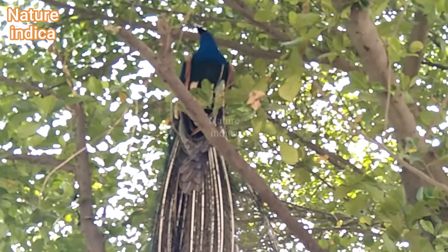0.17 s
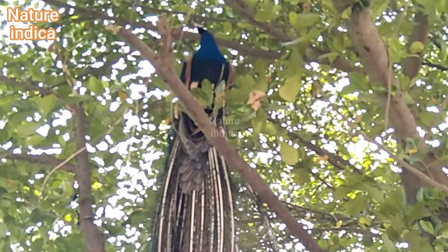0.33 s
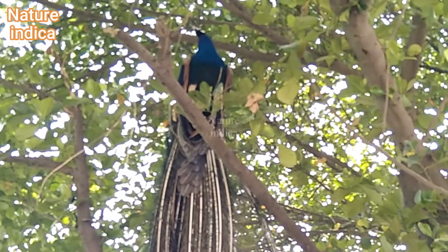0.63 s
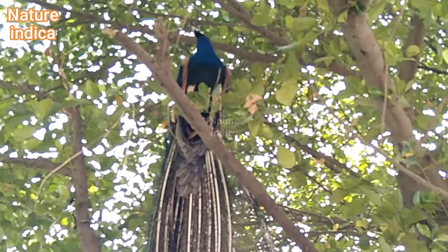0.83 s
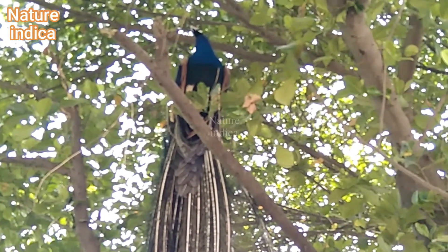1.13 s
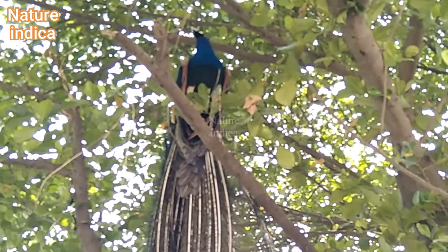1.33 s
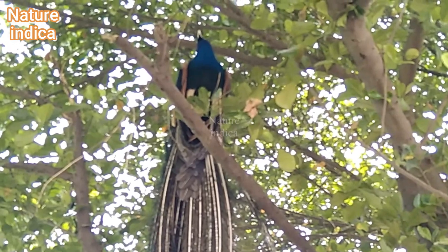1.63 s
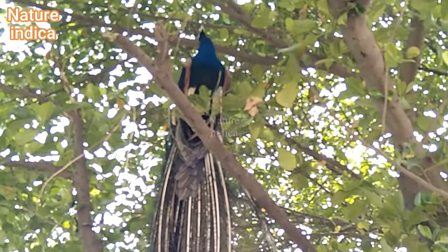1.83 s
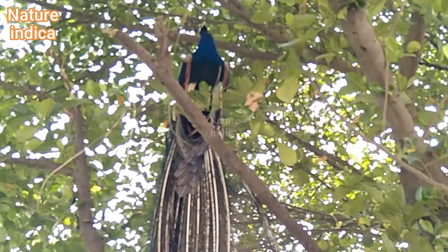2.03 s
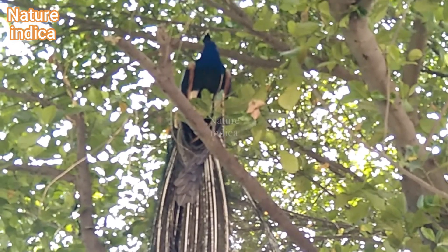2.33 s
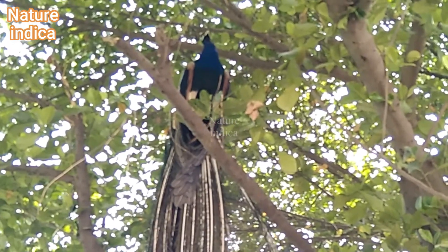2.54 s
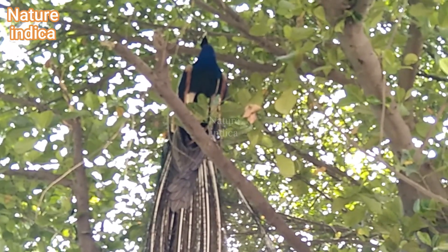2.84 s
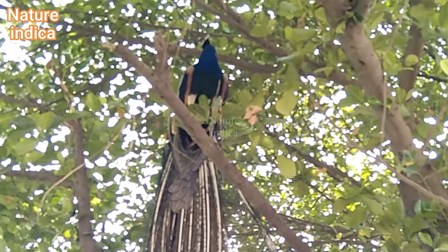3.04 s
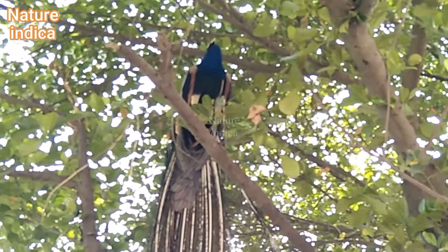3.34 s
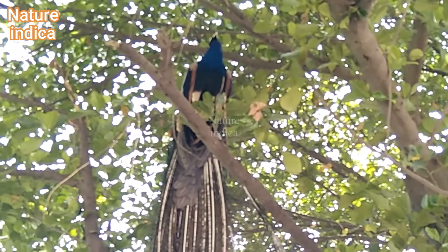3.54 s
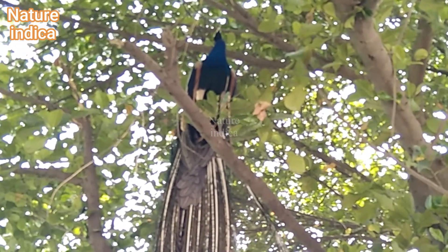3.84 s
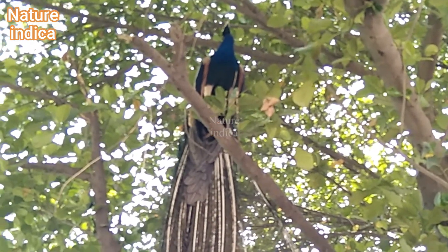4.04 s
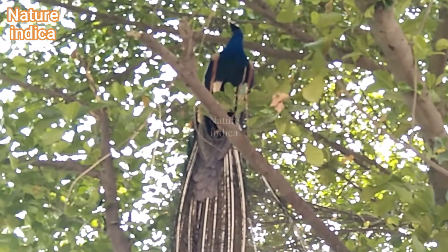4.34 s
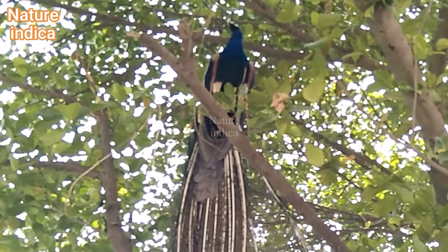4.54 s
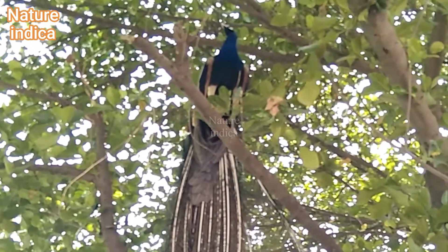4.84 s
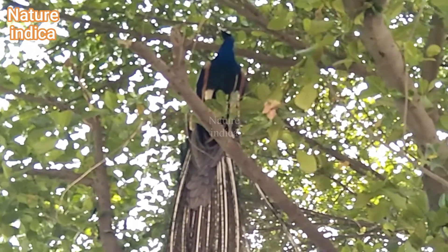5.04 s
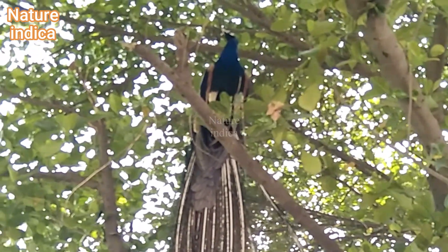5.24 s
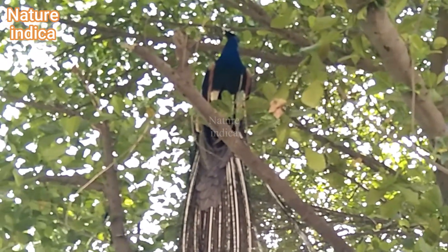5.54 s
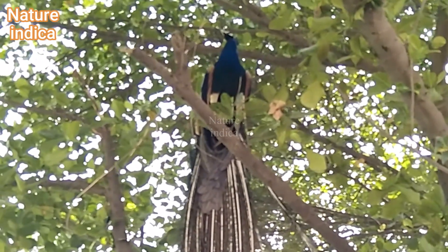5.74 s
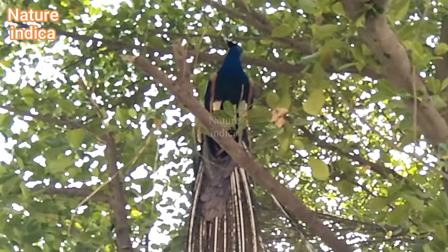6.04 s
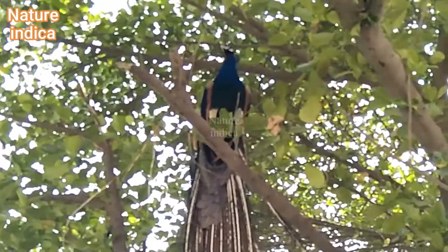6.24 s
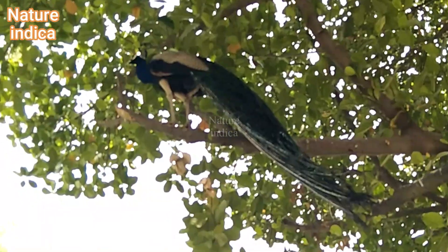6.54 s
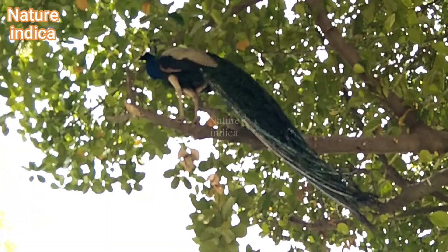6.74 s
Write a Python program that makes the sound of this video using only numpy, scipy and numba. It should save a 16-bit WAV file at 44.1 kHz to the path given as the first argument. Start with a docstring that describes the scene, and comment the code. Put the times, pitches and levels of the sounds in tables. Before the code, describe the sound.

A peacock wails loudly twice close by, first fluttering then clear, over crows, chirps and a puttering engine; a distant peacock answers at the end.

```python
"""Peacock wailing in a garden

A peacock wails twice close by, first with a fluttering voice, then clear; the garden echoes it. Syrinx tones
ring throat resonances, in crow caws too; small birds are gliding sines, swishes, leaves and insects shaped noise.
A far one-cylinder engine is pulses ringing an exhaust. At the end the place changes: another background
hiss, no engine, and a distant peacock of few partials. Mono in both channels, with gain control."""
import sys
import numpy as np
from scipy import signal
from scipy.io import wavfile
from scipy.ndimage import uniform_filter1d, map_coordinates
from numba import njit

SR = 44100
rng = np.random.default_rng(int(sys.argv[2]) if len(sys.argv) > 2 else 0)


def int16_out(signal):
    """Quantize to a 16-bit WAV file."""
    q = np.round(np.clip(np.atleast_2d(signal).T, -1, 1) * 32767)
    wavfile.write(sys.argv[1], SR, q.astype(np.int16))


N = 303849
T = np.arange(N) / SR
CHANGE_S = 6.365  # the second place begins
TOP_HZ = 15500


def undb(db):
    """Amplitude ratio of a level in dB."""
    return 10 ** (np.asarray(db) / 20)


def unit(x):
    """Scale to an rms of 1."""
    return x / np.sqrt(np.mean(x ** 2))


def noise():
    """White noise as long as the scene."""
    return rng.standard_normal(N)


def read(table, t):
    """Columns of a curve table at times t."""
    s, *columns = np.transpose(table)
    return [np.interp(t, s, c) for c in columns]


def span(start_s, length_s, fade_s=0.0036, out_s=None):
    """Sample slice of an event, progress 0-1 through it, and soft ends."""
    part = slice(int(start_s * SR), min(int((start_s + length_s) * SR), N))
    t = T[part] - T[part][0]
    ends = np.minimum(t / fade_s, (t[-1] - t) / (out_s or fade_s))
    return part, t / t[-1], np.clip(ends, 0, 1)


@njit
def svf(x, hz, width_hz):
    """State-variable band-pass with a moving centre, gain 1 there."""
    y, band_state, low_state = np.empty(len(x)), 0., 0.
    for i in range(len(x)):
        g, k = np.tan(np.pi * hz[i] / SR), width_hz / hz[i]
        v = (band_state + g * (x[i] - low_state)) / (1 + g * (g + k))
        band_state, low_state = 2 * v - band_state, low_state + 2 * g * v
        y[i] = k * v
    return y


def band(x, hz, width_hz):
    """Band-pass with a fixed centre."""
    return svf(x, hz + np.zeros(len(x)), 1. * width_hz)


def band_twice(x, hz, width_hz):
    """Two equal band-passes in series, for steeper skirts."""
    return band(band(x, hz, width_hz), hz, width_hz)


@njit
def follow(x, attack, release):
    """Envelope that rises fast and falls slowly."""
    y, e = np.empty(len(x)), 0.
    for i in range(len(x)):
        e += (abs(x[i]) - e) * (attack if abs(x[i]) > e else release)
        y[i] = e
    return y


def walk(rate_hz, size=N):
    """Random levels held 1 / rate_hz s and slewed twice; spread near 1."""
    hold = int(SR / rate_hz)
    steps = np.repeat(rng.standard_normal(size // hold + 1), hold)
    return 1.3 * uniform_filter1d(uniform_filter1d(steps, hold), hold)[:size]


def steady(x):
    """Even out the slow level, so that a curve alone sets it."""
    return x / np.sqrt(uniform_filter1d(x ** 2, SR // 20) + 1e-12)


def coloured(points, patchy_db, flicker_db):
    """Noise whose level wanders in broad slow patches and in narrow quick ones."""
    hz, db = np.transpose(points)
    f, t, frames = signal.stft(noise(), SR, nperseg=1024)
    octave = np.log2(np.maximum(f, 20) / 20)[:, None]
    gain_db = np.interp(np.log(np.maximum(f, 1)), np.log(hz), db)[:, None]
    for depth_db, per_octave, per_s in ((patchy_db, 1.5, 2.5), (flicker_db, 8, 4)):
        place = np.broadcast_arrays(octave * per_octave, t[None] * per_s)
        gain_db = gain_db + depth_db * map_coordinates(rng.standard_normal((90, 60)), place, order=1)
    return unit(signal.istft(frames * undb(gain_db), SR, nperseg=1024)[1][:N])


def syrinx(hz, flutter_hz, depth, bend, rasp, tilt, sway_db):
    """Membranes at the pitch, and the slower flutter that shakes them; rasp turns the cycles noisy."""
    size = len(hz)
    beat = 2 * np.pi * np.cumsum(flutter_hz * (1 + .006 * walk(21.0, size))) / SR
    # each flutter beat rises a little faster than it falls
    shape = np.sin(beat) + .3 * np.sin(2 * beat)
    pitch_hz = hz * (1 + bend * np.sin(beat + 0.29) + 0.018 * rasp * walk(300, size))
    phase = 2 * np.pi * np.cumsum(pitch_hz) / SR
    tone = np.zeros(size)
    for k in range(1, 27):
        # every overtone swells and sinks at random on its own
        sway = undb(sway_db * walk(17.37, size))
        tone += k ** -tilt * sway * np.cos(k * phase) * (k * hz < TOP_HZ)
    puffs = unit(np.gradient(rng.standard_normal(size)) * (7.8 + np.cos(phase)))
    source = unit(tone) * np.sqrt(1 - np.clip(rasp, 0, .95) ** 2) + rasp * puffs
    return source, np.maximum(depth * shape, -.95)


def first_place_air():
    """Distant traffic and air: patchy coloured noise."""
    # spectrum: hz, level_db (per Hz)
    spectrum = [(15, -35), (25, -34), (76, 13), (249, -7), (397, -12.5), (615, -4), (1170, -1), (1300, 1.5),
                (1730, 0), (2750, -8), (3380, -3.5), (4610, -1), (6130, -18.5), (8800, -35), (12000, -73),
                (15600, -84), (22000, -120)]
    return coloured(spectrum, 4.0, 6.0) * undb(-54.5)


def leaves():
    """Rustle: patchy noise, strongest below about 8 kHz, following a level curve."""
    # rustle: start_s, level_db
    rustle = [(0, -80), (1.1, -98), (1.3, -51.5), (1.8, -51), (4.2, -85), (5.1, -59), (5.4, -55),
              (6.0, -53)]
    # spectrum: hz, level_db (per Hz)
    spectrum = [(800, -4), (2500, -2), (4500, -2), (8000, -10.5), (11000, -26), (15500, -32)]
    return coloured(spectrum, 3.0, 4.5) * undb(read(rustle, T)[0])


def second_place_hiss():
    """Background of the second place: nearly even coloured noise."""
    # spectrum: hz, level_db (per Hz)
    spectrum = [(15, -43), (25, -7), (213, -7), (377, -19.5), (776, -16), (1240, -16), (1560, -13),
                (2180, -16), (3050, -18.5), (9510, -16), (12000, -73), (15600, -100), (22000, -120)]
    return coloured(spectrum, 0.43, 0.68) * undb(-50)


def insects():
    """Hiss: bands of noise, each swelling slowly on its own."""
    # hiss bands: centre_hz, width_hz, level_db
    bands = [(8580, 120, -69.5), (9280, 460, -70), (7380, 790, -69)]
    return sum(unit(band_twice(noise(), f, w)) * undb(db + 1.7 * walk(2.5)) for f, w, db in bands)


def background():
    """Air and leaves of the first place, then the second place's hiss; insects throughout."""
    return np.where(T < CHANGE_S, first_place_air() + leaves(), second_place_hiss()) + insects()


def chatter(count=260):
    """A flock further off: many faint falling chirps at random moments."""
    # chirp level curve: start_s, peak_db
    curve = [(0, -86), (1.2, -84), (1.8, -44), (4.0, -70), (4.7, -52), (5.4, -50.5), (6.3, -52.5),
             (6.89, -68)]
    when, length, top, fall, size = rng.random((count, 5)).T
    s = when * (N / SR - .1)
    db = read(curve, s)[0] + 3.4 * np.log(size + 0.071)
    from_hz = 3300 + 2100 * top
    return list(zip(s, 0.009 + 0.0293 * length, from_hz, from_hz * (.95 - 0.211 * fall), db))


def murmur(count=70):
    """Far bird calls: long, faint, slowly gliding tones."""
    when, length, height, glide, size = rng.random((count, 5)).T
    s = when * (N / SR - .5)
    hz = 500 * 6 ** height
    db = -60.5 + 2.1 * np.log(size + 0.098)
    return list(zip(s, 0.093 + 0.36 * length, hz, hz * (1 + .12 * (2 * glide - 1)), db))


def small_birds():
    """Chirps and far calls: sines gliding under a smooth hump of level."""
    # nearer chirps, mostly falling: start_s, length_s, from_hz, to_hz, peak_db
    nearer = [(1.418, 0.043, 3900, 3200, -49), (1.496, 0.061, 4400, 3700, -52),
              (1.619, 0.046, 4700, 4070, -50), (1.728, 0.06, 4860, 3800, -65),
              (4.004, 0.075, 3960, 3396, -57.5), (4.295, 0.057, 5250, 5300, -54),
              (4.337, 0.036, 5250, 3920, -52), (4.615, .11, 5400, 5220, -60),
              (4.676, 0.054, 5430, 4080, -55), (5.046, .03, 5400, 3850, -53),
              (5.035, .016, 3800, 3020, -49), (5.1, 0.028, 3900, 2940, -46),
              (5.205, 0.036, 4550, 3800, -49), (5.236, 0.018, 3170, 2800, -50),
              (5.588, .025, 4300, 3880, -47), (5.792, 0.041, 4600, 3940, -47)]
    out = np.zeros(N)
    for s, length_s, from_hz, to_hz, db in nearer + chatter() + murmur():
        size, at = int(length_s * SR), int(s * SR)
        phase = 2 * np.pi * np.cumsum(np.linspace(from_hz, to_hz, size)) / SR
        out[at:at + size] += undb(db) * np.hanning(size) * np.sin(phase)
    return out


def swishes():
    """Hoarse swishes: rough noise through a band whose centre moves along a parabola."""
    # swishes: start_s, length_s, from_hz, middle_hz, to_hz, level_db
    events = [(0.117, 0.16, 4060, 5860, 5230, -57), (2.844, 0.19, 5670, 4520, 3820, -49.5),
              (5.426, 0.11, 3250, 2630, 2480, -47), (5.919, 0.36, 4560, 5290, 3820, -49)]
    width_hz = 900.
    out = np.zeros(N)
    for start_s, length_s, from_hz, mid_hz, to_hz, db in events:
        part, x, ends = span(start_s, length_s, fade_s=0.043)
        bow_hz = (from_hz + to_hz) / 2 - mid_hz
        hz = mid_hz + (to_hz - from_hz) * (x - .5) + bow_hz * (2 * x - 1) ** 2
        air = rng.standard_normal(len(hz)) * undb(1.3 * walk(70.6, len(hz)))
        out[part] += unit(svf(svf(air, hz, width_hz), hz, width_hz)) * undb(db) * ends
    return out


def ticks():
    """Ticks: a sine and a burst of bright noise dying within milliseconds."""
    # ticks: start_s, level_db, tone_hz
    events = [(0.1796, -38, 5820), (1.791, -49, 3500), (4.11, -44, 4200), (6.6184, -33, 6760),
              (6.6628, -37.5, 2950)]
    out = np.zeros(N)
    t = T[:400]
    decay = np.exp(-t / 0.0014) * np.clip(t / 0.00019, 0, 1)
    for s, db, hz in events:
        at = int(s * SR)
        burst = 1.9 * band_twice(rng.standard_normal(400), 6500, 5200)
        out[at:at + 400] += undb(db) * decay * (np.sin(2 * np.pi * hz * t) + burst)
    return out


def engine():
    """One push per firing rings the exhaust; a wall sends it back a little later."""
    # firing rate: start_s, firings_per_s
    speed = [(1.082, 5.64), (1.54, 17.39), (2.1, 17.89), (2.38, 16.69), (2.62, 12.8), (3.2, 12.5),
             (3.8, 12.94), (4.5, 12.59), (5.2, 12.76), (6.36, 13.38)]
    # loudness: start_s, level_db
    loudness = [(1.0, -72), (1.55, -54), (2.1, -57), (3.0, -70), (4.0, -56.5), (4.6, -53), (5.0, -58),
                (5.5, -52), (6.3, -52)]
    # exhaust resonances: centre_hz, nominal_width_hz, level_db (relative)
    exhaust = [(76.5, 62, -11), (138, 50, -8), (223, 97, -8)]
    t = T - .008
    running = (t > 1.082) * (T < CHANGE_S)
    turns = np.floor(np.cumsum(read(speed, t)[0] * running) / SR)
    fired = np.flatnonzero(np.diff(turns) > 0)
    pulses = np.zeros(N)
    pulses[fired] = undb(0.3 * rng.standard_normal(len(fired)))
    thump = np.zeros(N)
    for k, (f, w, db) in enumerate(exhaust):
        thump += (-1) ** k * undb(db) * band_twice(pulses, f, 0.84 * w) / w
    thump = thump + undb(-16.5) * np.roll(thump, int(0.0244 * SR))
    return unit(thump) * undb(read(loudness, T)[0])


def crows():
    """Harsh caws: a voice chopped 99 to 191 times a second; pitch and level arch together."""
    # caws: start_s, length_s, top_pitch_hz, peak_db, chop_hz, top_place (0-1), dulling_db_per_khz, rasp (0-1)
    caws = [(1.099, .24, 590, -39, 103.4, 0.61, 1.2, 0.58),
            (1.558, 0.25, 601.4, -37.5, 99.1, 0.27, 2.8, 0.42),
            (4.323, .27, 563, -40.5, 190.8, .72, 1, 0.44)]
    # throat resonances: centre_hz, width_hz, level_db (relative)
    throat = [(1340, 720, 1.5), (1500, 122, 1.5), (3120, 360, -3.5), (6360, 560, -9)]
    sag, fade_db = .15, 6  # pitch share and level lost at the ends
    out = np.zeros(N)
    for start_s, length_s, top_hz, db, chop_hz, top, dull_db, rasp in caws:
        part, x, ends = span(start_s, length_s, fade_s=0.047)
        off = np.interp(x, [0, top, 1], [1, 0, 1]) ** 2
        hz = top_hz * (1 - sag * off + .02 * walk(25, len(x)))
        source, chop = syrinx(hz, chop_hz, .8, .02, rasp, tilt=.2, sway_db=2.5)
        source += rasp * rng.standard_normal(len(x))  # air rushing past the membranes
        chopped = source * (1 + chop)
        voice = sum(undb(d - dull_db * f / 1000) * band_twice(chopped, f, w) for f, w, d in throat)
        out[part] = steady(voice) * undb(db - fade_db * off) * ends
    return out


def peacock():
    """Each wail rings the throat resonances, whose balance shifts as the beak opens."""
    # per wail: start_s, pitch_hz, level_db, beak_opening (0-1), treble_lift_db, rasp (0-1)
    wails = [
        [(1.845, 680.5, -25, 0.068, 6, 0.47), (1.95, 688.4, -22, 0, 0, 0.49),
         (2.03, 718.7, -17, 0.42, -2.5, 0.58), (2.17, 729, -13, 0.98, 5.5, 0.4),
         (2.25, 709.8, -12, 1, 4.5, 0.36), (2.45, 706.1, -13, 0.96, 2, 0.36),
         (2.6, 689.6, -14, 0.98, -3.5, 0.58), (2.7, 664, -16, 1, -13.5, 0.36),
         (2.755, 645, -19, 0.99, -15, 0.55), (2.8, 614, -30.5, 1, -3, 0.3)],
        [(3.055, 573, -25.5, 0.2, 2, 0.075), (3.075, 577, -17, 0.046, 4.5, 0.1),
         (3.135, 596, -14.5, 0, -5.5, 0.075), (3.19, 579.2, -12.5, 0, 2.5, 0.11),
         (3.23, 582.7, -12.5, 0, -2, .1), (3.241, 669.3, -11, 0, -8, 0.27), (3.262, 698.6, -16, 0, 9.5, 0.15),
         (3.305, 722.2, -12.5, 0.28, 2, 0.064), (3.36, 731.6, -13.5, 0.45, 6.5, 0.079),
         (3.45, 738, -13, 0.74, 2, 0.054), (3.53, 736.6, -13.5, 0.74, -2.5, 0.037),
         (3.585, 728, -13, 0.68, 3, 0.078), (3.65, 700, -13.5, 0.69, 2, 0.044),
         (3.705, 664.6, -14.5, 0.49, 2, 0.097), (3.76, 649.2, -15, 0.24, -6.5, 0.097),
         (3.8, 610, -20, 0, -7.5, 1), (3.83, 587, -20.5, 0.065, -12, 0.99), (3.87, 578.5, -36, 0.91, 0, 0.88)],
    ]
    # throat: centre_hz, width_hz, wail1_narrow_db, wail1_wide_db, wail2_narrow_db, wail2_wide_db
    throat = [(1314, 417, -4.5, -2.5, -8.5, 2), (2231, 330, -13, -17, 1.5, -14.5),
              (2920, 240, -51, -14, -27, -18.5), (3565, 560, -5, -12, -5.5, -12),
              (4560, 1820, -38, -7.5, -17.5, -13.5), (6004, 1160, -2, -25.5, -20.5, -3),
              (7900, 2560, -13, -6, -13, -9)]
    # flutter rate: start_s, rate_hz
    flutter_rate = [(1.845, 33.6), (1.9, 42.2), (2.0, 51.33), (2.2, 53.9), (2.33, 49.47), (2.8, 50.17)]
    # per wail, beak narrow then wide: depth, depth, lowest_partial_db, _db, highest_overtones_db, _db
    flutters = [(0.96, 0.6, -10, -12.5, -39, -29), (.05, .01, -19, -8.5, -43, -36)]
    # per wail: share of the pitch that the flutter bends
    bends = [.01, .0007]
    # nearby ground and trunks: delay_s, level_db
    reflections = [(.0043, -6.5), (.0091, -9), (.0157, -9), (.0238, -26), (.0351, -14)]
    lag_s, fall = .0006, .78  # flutter per resonance: later and shallower
    out = np.zeros(N)
    for call, (table, bend, (narrow, wide, *outer_db)) in enumerate(zip(wails, bends, flutters)):
        part, _, ends = span(table[0][0], table[-1][0] - table[0][0], out_s=.04)
        hz, db, opening, lift_db, rasp = read(table, T[part])
        opening = np.clip(opening, 0, 1)
        depth = narrow + (wide - narrow) * opening
        rate_hz, = read(flutter_rate, T[part])
        source, flutter = syrinx(hz, rate_hz, depth, bend, rasp, tilt=0.12, sway_db=3.8)
        source += sum(undb(d) * np.roll(source, int(s * SR)) for s, d in reflections)

        gains = []
        for k, (_, _, *d) in enumerate(throat):
            narrow_db, wide_db = d[2 * call:2 * call + 2]
            treble_db = lift_db * k / (len(throat) - 1)
            gains.append(undb(narrow_db + (wide_db - narrow_db) * opening + treble_db))
        gains = np.array(gains)
        gains /= np.sqrt(np.sum(gains ** 2, axis=0))

        # the highest overtones escape the resonances
        highest_db = np.interp(opening, [0, 1], outer_db[2:]) + lift_db / 2
        voice = undb(highest_db) * steady(band(source, 11500, 6700))
        for k, (f, w, *_) in enumerate(throat):
            throb = 1 + fall ** k * np.roll(flutter, int(k * lag_s * SR))
            voice += (-1) ** k * gains[k] * steady(band_twice(source, f, w)) * throb

        # the lowest partial follows only a deep flutter
        lowest = steady(svf(svf(source, hz, 350.), hz, 350.)) * (1 + depth ** 2 * flutter)
        lowest *= undb(np.interp(opening, [0, 1], outer_db[:2]))
        out[part] += (voice / np.sqrt(1 + depth ** 2 / 2) + lowest) * undb(db) * ends
    return out


def far_peacock():
    """Distance leaves one strong partial and a few faint ones."""
    # notes: start_s, length_s, attack_s, level_db
    note_table = [(6.365, .04, .004, -33), (6.415, .092, .012, -36.5), (6.512, .39, .09, -35)]
    # partials: multiple of the strongest, level_db (relative)
    partials = [(.5, -24.5), (1, -2), (1.5, -28.5), (2, -29.5), (2.5, -31), (4.5, -34)]
    since_s = T - CHANGE_S
    # the strongest partial sinks ever faster
    phase = 2 * np.pi * np.cumsum(1563.5 - 280 * since_s ** 2) / SR
    # the call opens with a rattle
    until_s, rate_hz, depth = 6.41, 195, .75
    turn = 2 * np.pi * rate_hz * since_s
    rattle = 1 + depth * (T < until_s) * (np.sin(turn) - 0.23 * np.cos(2 * turn))
    tone = sum(undb(d + 3.0 * (m != 1) * walk(14)) * np.sin(m * phase) for m, d in partials)
    # a side tone at 5/4 of the pitch joins late
    tone += undb(-22) * np.clip((T - 6.61) / 0.06, 0, 1) * np.sin(5 / 4 * phase)
    notes = np.zeros(N)
    for start_s, length_s, attack_s, db in note_table:
        part, _, ends = span(start_s, length_s, fade_s=attack_s, out_s=.008)
        notes[part] = undb(db) * ends
    waver = undb(2.2 * walk(30))
    return np.sqrt(2) * tone * rattle * notes * waver


def garden_echo(x):
    """Trees and walls return a fading wash, longest around the mids."""
    t60_s, mid_hz = 1.074, 1330
    t = T[:int(1.5 * SR)]
    wash = rng.standard_normal(len(t)) * np.clip(t / 0.016, 0, 1)
    fade = np.log(1000) * t / t60_s
    tail = band(wash, mid_hz, 830) * np.exp(-fade) + .5 * wash * np.exp(-4.0 * fade)
    return signal.fftconvolve(x, tail / np.sqrt(np.sum(tail ** 2)))[:N]


def scene():
    """Sum the sources and the echo of all animal calls, swishes and ticks."""
    near, far = peacock(), far_peacock()
    others = crows() + small_birds() + swishes() + ticks()
    echo = undb(-23.5) * near + undb(-17) * others + undb(-24) * far
    mono = near + others + far + garden_echo(echo) + engine() + background()
    return np.array([mono, mono])


def record(dry):
    """Gain control pulls everything down under loud calls; the microphone bends slightly; the top is cut."""
    attack_s, release_s, threshold_db = 0.021, .12, -17.0
    level = follow(dry[0], 1 / (attack_s * SR), 1 / (release_s * SR))
    wet = dry * np.minimum(1, undb(threshold_db) / (level + 1e-9)) ** 0.49
    wet = wet + 0.32 * band_twice(wet[0] ** 2, 380, 600)
    return signal.sosfilt(signal.ellip(10, .2, 70, TOP_HZ, fs=SR, output="sos"), wet)


dry = scene()
out = record(dry)
int16_out(out)
```